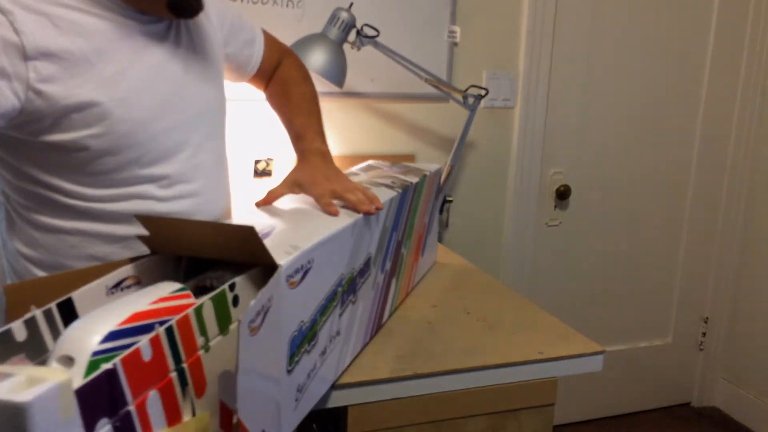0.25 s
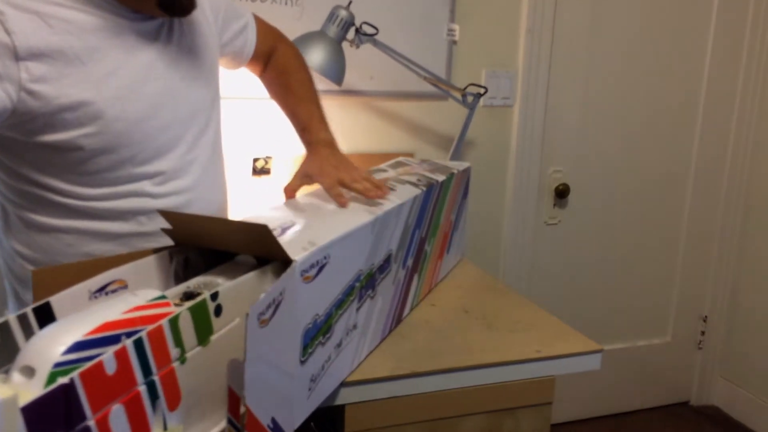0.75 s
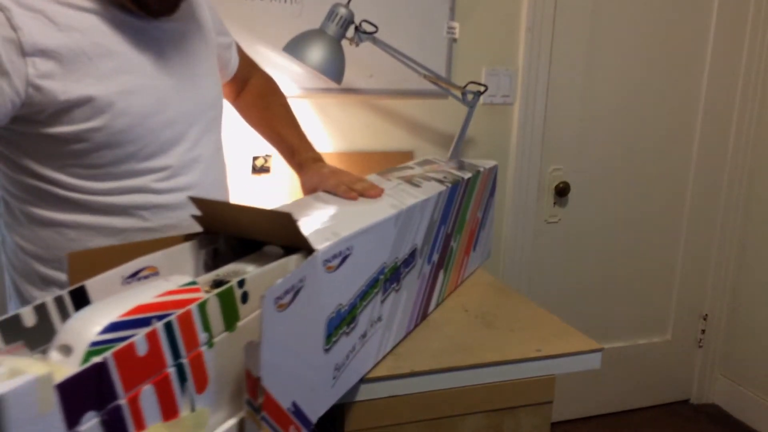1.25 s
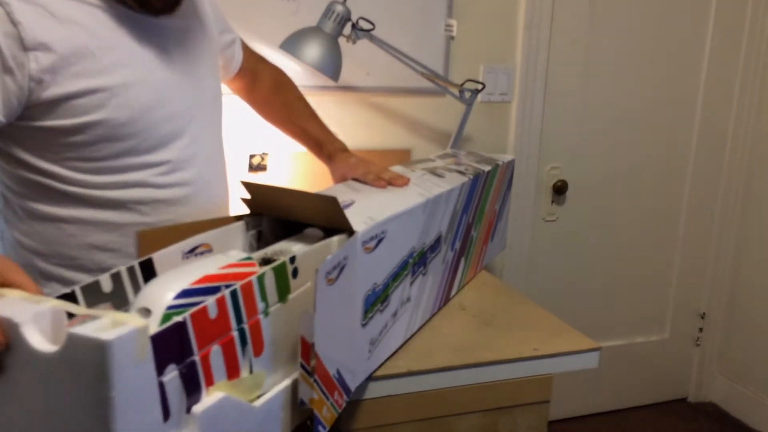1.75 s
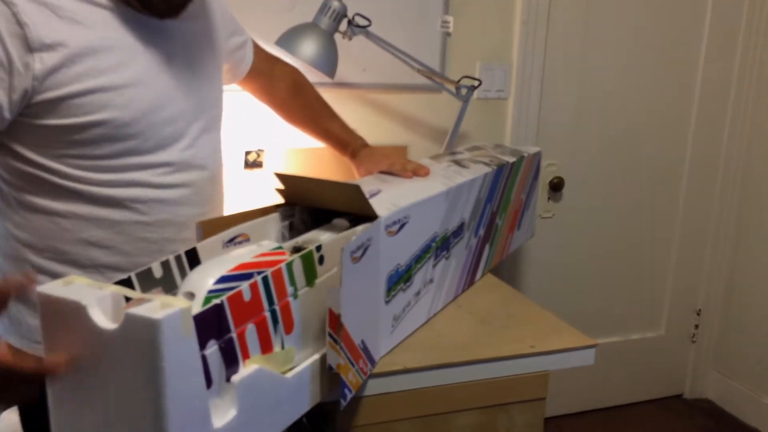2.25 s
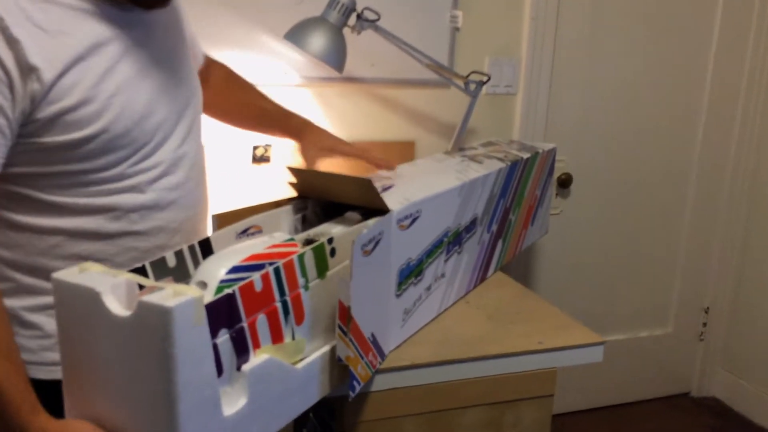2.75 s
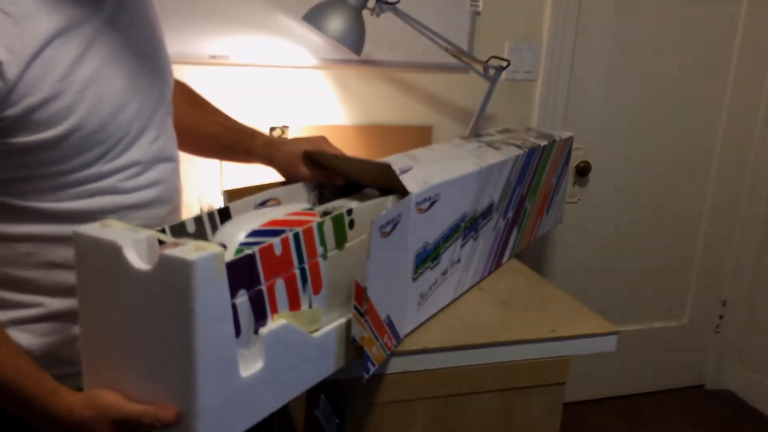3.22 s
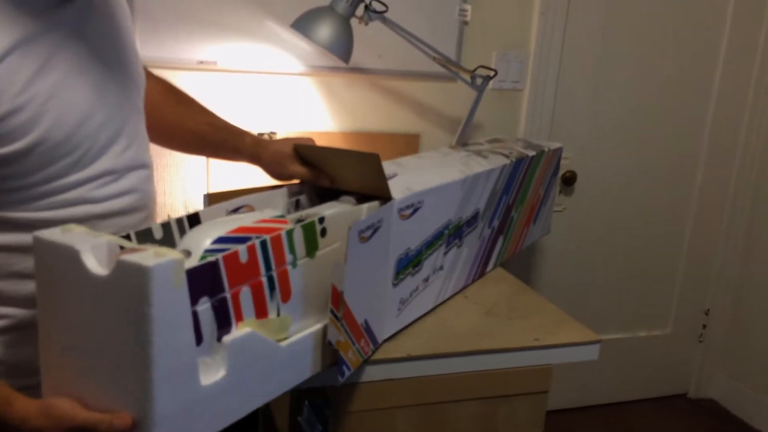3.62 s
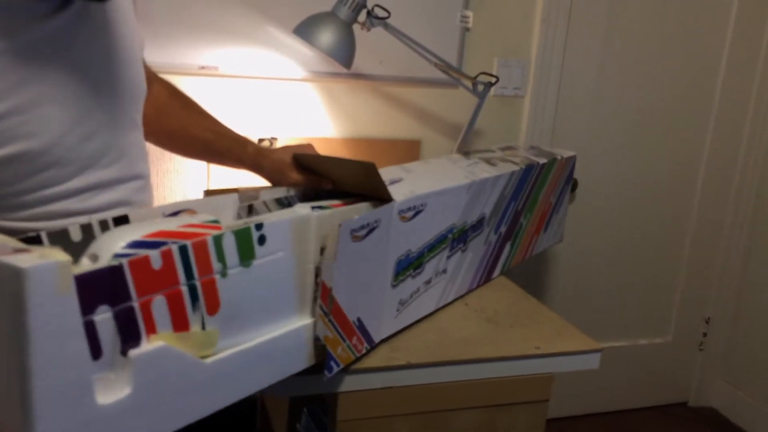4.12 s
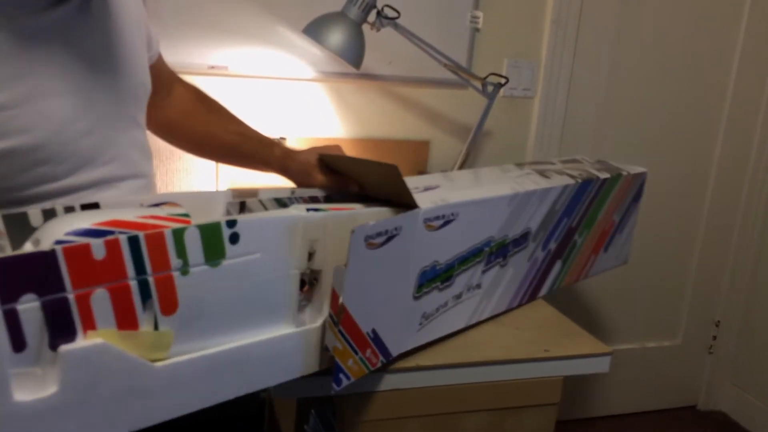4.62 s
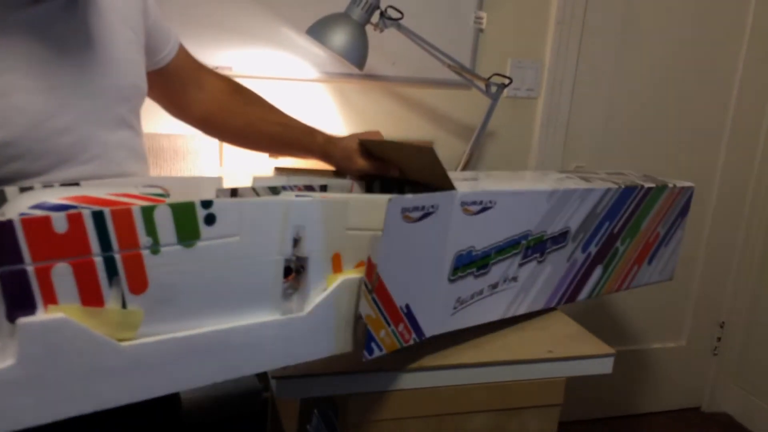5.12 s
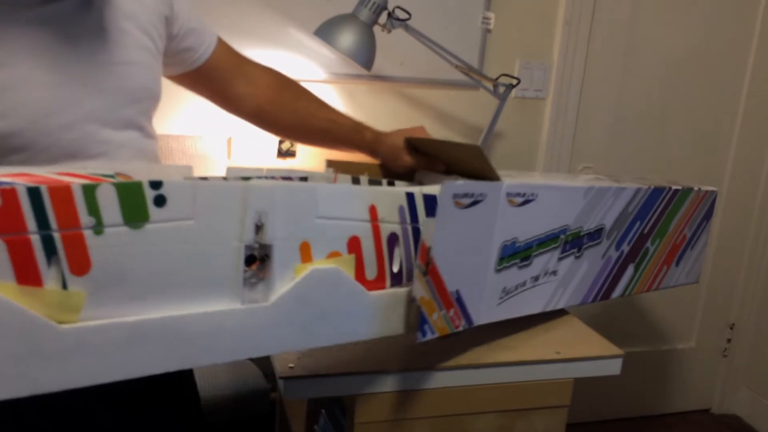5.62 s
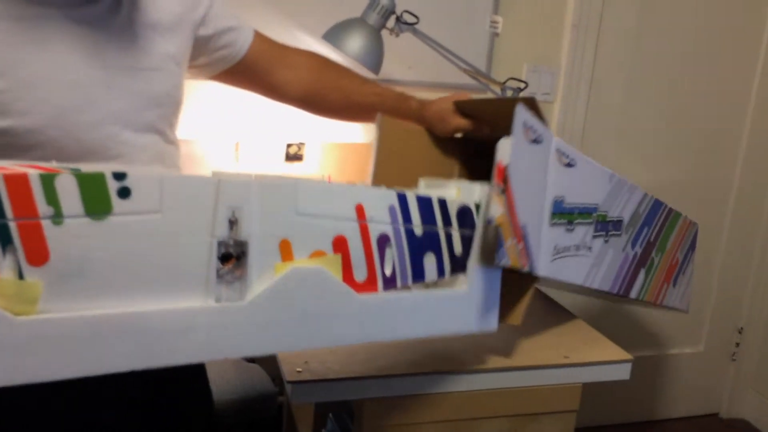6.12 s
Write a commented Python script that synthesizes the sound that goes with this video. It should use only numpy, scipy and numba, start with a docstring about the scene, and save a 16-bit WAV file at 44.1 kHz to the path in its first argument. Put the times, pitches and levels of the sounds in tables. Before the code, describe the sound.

Close, stuttering rub of packing foam on glossy cardboard, pausing and restarting, then a hard knock and a long louder slide ending in a thump.

```python
"""Jerky, papery scraping throughout: a foam tray is pulled out of a long cardboard box, heard close up.
Dense stick-slip releases ring the box walls and panels, and at times one resonance sings out alone.
Foam beads hiss and whistle on the glossy card; this hiss is made of finer slips.
Decaying rings make the box thud on the table and its edges tick, in a small quiet room with still air.
"""
import sys
import numpy as np
from scipy import signal
from scipy.fft import rfft, irfft
from scipy.io import wavfile
from scipy.ndimage import uniform_filter1d
from numba import njit

SR = 44100
rng = np.random.default_rng(int(sys.argv[2]) if len(sys.argv) > 2 else 0)


def generate_wav(signal):
    """Clip the signal to [-1, 1] and save it as 16-bit WAV at the path in sys.argv[1]."""
    frames = np.transpose(np.atleast_2d(signal))
    scaled = np.clip(frames, -1, 1) * 32767
    pcm = np.round(scaled).astype(np.int16)
    wavfile.write(sys.argv[1], SR, pcm)


N = 280917

# One list per pull; pressure sets the scrape, speed the hiss: (t/s, scrape level/dB, bead hiss level/dB)
PULLS = [
    [(0.0, -38.5, -37.5), (0.02, -44.5, -39), (0.198, -39.5, -39), (0.402, -37.5, -40.5),
     (0.45, -37, -38.5), (0.618, -40, -43.5), (0.67, -49, -50)],
    [(0.726, -50, -50), (0.784, -49.5, -61), (0.805, -52, -55.5), (0.885, -51.5, -54), (0.91, -61.5, -68),
     (1.01, -62.5, -78), (1.045, -57, -71), (1.1, -57.5, -68)],
    [(1.135, -51.5, -61), (1.162, -41.5, -48), (1.222, -46, -49.5), (1.25, -40.5, -44), (1.276, -38, -42),
     (1.305, -42.5, -46.5), (1.335, -46.5, -51.5), (1.468, -43, -46.5), (1.548, -39.5, -44.5),
     (1.606, -53, -63)],
    [(1.655, -50.5, -46), (1.698, -35, -41.5), (1.738, -57, -51), (1.83, -48.5, -62), (1.86, -52.5, -68)],
    [(1.874, -43.5, -47.5), (1.948, -40.5, -48.5), (2.044, -45, -55), (2.12, -43, -50.5),
     (2.16, -45.5, -53), (2.195, -39.5, -48), (2.215, -39.5, -49), (2.24, -38.5, -45.5), (2.27, -42.5, -49),
     (2.3, -43, -49), (2.342, -46.5, -52), (2.416, -56, -67), (2.455, -55, -70)],
    [(2.465, -58, -49), (2.533, -62, -52.5), (2.575, -47.5, -48.5), (2.635, -45, -48.5), (2.668, -56, -55),
     (2.68, -53, -50.5), (2.728, -56, -52.5), (2.81, -49, -49), (2.838, -52, -52.5), (2.875, -52, -54.5),
     (2.926, -47, -49.5), (3.022, -57.5, -66), (3.05, -59, -67)],
    [(3.116, -56.5, -55.5), (3.21, -44, -55.5), (3.29, -51.5, -55.5), (3.342, -55, -67)],
    [(3.374, -44, -46.5), (3.44, -44.5, -46), (3.602, -42.5, -43), (3.648, -44.5, -46.5), (3.748, -52, -62)],
    [(3.78, -47, -45), (3.836, -47.5, -44), (3.955, -35, -36.5), (3.982, -23.5, -34), (4.01, -37.5, -39.5),
     (4.088, -44.5, -41.5), (4.252, -38, -45.5), (4.29, -43, -58), (4.325, -48, -63), (4.385, -48.5, -58),
     (4.415, -43, -56)],
    [(4.446, -36, -45.5), (4.556, -31, -38), (4.656, -30.5, -39), (4.72, -35, -45), (4.78, -36, -48.5),
     (4.83, -32.5, -38.5), (4.914, -31, -35), (5.124, -31.5, -40), (5.442, -34, -40.5), (5.55, -41.5, -42)],
    [(5.626, -46, -46), (5.734, -46.5, -46), (5.768, -44, -42.5), (5.845, -49.5, -43.5),
     (5.862, -40, -40.5), (5.905, -36, -40), (5.945, -37.5, -43.5), (5.96, -45, -44), (5.98, -43.5, -40.5),
     (6.1, -48, -41), (6.118, -39, -40), (6.15, -42.5, -42), (6.195, -43, -41.5), (6.225, -42.5, -46)],
    [(6.264, -38, -47), (6.282, -26.5, -35.5), (6.318, -33, -45.5), (6.37, -42, -48)],
]
# How the rubbing is shared out: (t/s, wall boom against scrape level/dB,
# fine hiss against bead hiss level/dB, flap against the other panels level/dB)
RUB_BALANCE = [(0.0, 1.5, -11, 3), (0.35, -0.5, -1.5, 2), (0.5, -1.5, -3.5, 0), (0.85, -1, -7, -1),
               (1.1, -0.5, -5, 1.5), (1.3, -5.5, -10, 1), (1.56, -4.5, -5, 1.5), (1.75, -10, -3, -1),
               (1.9, -2.5, -1.5, -1.5), (2.1, -4.5, -1.5, -1), (2.3, 0, -5, 1), (2.47, 0, 0.5, -1),
               (2.6, -6, 1, 1), (2.66, -4, 4, 3), (2.9, -8, 3, -0.5), (3.1, 1.5, -3, -2),
               (3.4, -8, -9.5, 0.5), (3.85, -7, -4.5, 1.5), (3.99, 1, 2.5, 0.5), (4.1, -11.5, -3.5, 8),
               (4.33, 2, -1, -2.5), (4.56, -7, -2.5, -2.5), (4.75, -0.5, -4.5, -3), (4.94, -11, -8, -1.5),
               (5.1, -4, -5.5, -4), (5.45, -7.5, -0.5, -0.5), (5.66, -18, -1.5, 0.5), (5.77, -12, -3.5, -1),
               (5.84, -13, 0, -2), (5.9, -3, 2.5, -3), (6.04, -20, 1.5, 2.5), (6.2, -5, 4, -6),
               (6.26, 4.5, 3.5, -5), (6.29, -6, -2, 1), (6.33, -1.5, 1, -2)]
# The whole contact catches and lets go: rms depth and rate of the shared throb
JUDDER_DB, JUDDER_PER_S = 0.76, 70
# After a blow the contact shudders on: level against the blow, time to die away
THUD_SHUDDER_DB, THUD_SHUDDER_T60_S = -12, 0.12
SHUDDER_DB_PER_OCTAVE = -0.5  # higher thuds leave slightly less shudder than deep ones
TICK_SHUDDER_DB, TICK_SHUDDER_T60_S = -19.5, 0.25
CRACK_SHUDDER_DB, CRACK_SHUDDER_T60_S = -23, 0.032


def sliding():
    """Rubbing: coarse slips drive walls and panels, finer ones hiss directly and ring the foam."""
    scrape_db, bead_db = curves(np.vstack(PULLS))
    boom_db, fine_db, flap_db = curves(RUB_BALANCE)
    judder_db = JUDDER_DB * walk(JUDDER_PER_S)
    scrape_db = scrape_db + judder_db
    bead_db = bead_db + 0.69 * judder_db

    # the slope is in dB per octave, taken from 300 Hz
    thud_blows = [(s, db + SHUDDER_DB_PER_OCTAVE * np.log2(hz / 300)) for s, db, hz, *_ in THUDS]
    panel_blows = [(s, db) for s, *_, db, hz, t60 in TICKS]
    crack_blows = [(s, db) for s, db, *_ in TICKS]

    scrape = shudder(scrape_db, panel_blows, TICK_SHUDDER_DB, TICK_SHUDDER_T60_S)
    boom = shudder(scrape_db + boom_db, thud_blows, THUD_SHUDDER_DB, THUD_SHUDDER_T60_S)
    bead = shudder(bead_db, crack_blows, CRACK_SHUDDER_DB, CRACK_SHUDDER_T60_S)
    fine = shudder(bead_db + fine_db, crack_blows, CRACK_SHUDDER_DB, CRACK_SHUDDER_T60_S)

    card = scrape * (rubbed_panels(boom_db, flap_db) + singing_panels()) + boom * rubbed_walls()
    foam = bead * (bead_hiss() + bead_whistles()) + fine * foam_tray()
    return card + foam + table_rumble(boom)


# Panel and flap modes: (f/Hz, width/Hz, level/dB)
PANELS = [(697, 75, 0.5), (815, 84, 6), (926, 46, 7), (1025, 102, 6), (1183, 194, 4), (1384, 130, 5),
          (1522, 40, 7), (1597, 56, 6), (1704, 55, 8), (1843, 65, 6.5), (2002, 46, 5.5), (2148, 87, 1.5),
          (2451, 150, 3.5), (2534, 206, -0.5), (2773, 89, -2), (3120, 190, -5.5)]
# Part of the box for each mode: 0 whole box, 1 low panels, 2 flap, 3 high panels
PANEL_PART = [0, 1, 1, 1, 0, 0, 0, 2, 2, 2, 2, 0, 0, 0, 3, 3]
# Panels above the flap: (t/s, level/dB)
HIGH_PANELS = [(0, -1), (1.2, 0), (1.28, 7), (1.4, 1), (2.5, -3), (3.2, -3), (3.5, 1), (4.25, 1), (4.3, -8),
               (4.42, -3), (4.58, 2), (4.75, 0), (4.95, 5), (5.3, 2.5), (5.8, -5), (6.1, -10), (6.2, -3),
               (6.29, -2)]
LOW_PANELS_PER_BOOM_DB = 0.28  # low panels gain this many dB for each dB of wall boom
GRIT_DB = -6.5  # slips heard straight through the card, against the ringing panels


def rubbed_panels(boom_db, flap_db):
    """Coarse slips excite the card's mid resonances, with gritty slips heard straight through it."""
    high_db, = curves(HIGH_PANELS)
    low_db = LOW_PANELS_PER_BOOM_DB * (boom_db - np.mean(boom_db))
    part_db = [0, low_db, flap_db, high_db]
    ringing = coupled(slips(2500, 1.98, 0.99), PANELS, [part_db[k] for k in PANEL_PART], 1.07)
    grit = ring(slips(1500, 2.35, 3.1), [(1470, 1760, 0)])
    panels = unit(ringing) + undb(GRIT_DB) * unit(grit)
    # small panels radiate no bass
    panels = signal.sosfilt(signal.butter(3, 650, "high", fs=SR, output="sos"), panels)
    return unit(ring(panels, [(1450, 3500, 0)]))


# A rubbed panel sings for a while; near the end the air in the box rises in pitch as the tray comes free:
# (start t/s, end t/s, first f/Hz, last f/Hz, level against scrape/dB)
RASPS = [(0.152, .215, 1900, 1690, -3), (.22, .355, 1810, 2000, -0.5), (.235, .3, 484, 486, -3),
         (0.392, 0.542, 1820, 1920, -2.5), (0.433, .51, 1070, 1080, -1.5), (1.24, 1.31, 1800, 1680, -6),
         (3.13, 3.2, 1750, 1650, -3), (1.26, 1.32, 1100, 1160, -7), (1.895, 1.956, 1870, 1500, -2),
         (2.74, 2.846, 1940, 1950, -5), (3.354, 3.47, 1750, 2100, -6), (3.52, 3.674, 1730, 1654, -2),
         (3.9, 3.957, 1940, 1760, 1.5), (4.078, 4.28, 1790, 1800, -9), (4.385, 4.41, 1690, 1700, 0),
         (4.422, 4.445, 990, 1000, -1), (4.45, 4.5, 1780, 1770, 0), (4.51, 4.757, 1800, 1680, -6.5),
         (4.56, 4.61, 3000, 3000, -11), (4.488, 4.56, 1180, 1170, -8), (4.56, 4.7, 917, 975, -7),
         (4.74, 4.893, 1033, 920, -4.5), (4.85, 5.0, 2860, 2840, -7.5), (4.849, 4.97, 1870, 1800, -8.5),
         (4.957, 5.075, 1740, 1750, -6.5), (5.005, 5.26, 507, 494, -7.5), (5.198, 5.43, 1740, 1930, -9.5),
         (5.272, 5.423, 890, 880, -8), (5.403, 5.63, 2340, 2470, -5.5), (5.63, 5.86, 2370, 2240, -11),
         (5.64, 5.85, 1590, 1640, -9), (5.854, 5.925, 940, 1030, -5), (5.86, 5.94, 2480, 2500, -9),
         (5.885, 5.945, 1630, 1230, -8), (5.974, 6.19, 2460, 2280, -9), (6.085, 6.204, 1720, 1770, -6.5),
         (6.218, 6.289, 400, 1010, 2.5), (6.304, 6.348, 633, 374, -0.5)]
# Width of each gliding resonance: a fixed part and a share of the pitch
RASP_WIDTH_HZ, RASP_WIDTH_SHARE = 70, 0.04


def singing_panels():
    """Slips excite narrow panel resonances that slide in pitch, and the box's air rising as the tray leaves."""
    return rasps(RASPS, RASP_WIDTH_HZ, RASP_WIDTH_SHARE, slips(1500, 2.2, 1.9))


# Low wall modes of the box: (f/Hz, width/Hz, level/dB)
WALLS = [(153.8, 20, 0), (212.2, 17, 3.5), (274.4, 27.4, 2), (319, 19, -0.5), (362, 41, -2),
         (432.6, 38.5, -0.5), (483, 48, 0), (566, 57, -3.5), (681, 74, -2.5)]
# Coupling into the long wall, the lowest mode: (t/s, level/dB)
LONG_WALL = [(0, 4), (3.8, 4.5), (4.4, -6), (4.9, -35), (5.7, -28), (5.8, -10), (6.0, -32), (6.2, 9)]


def rubbed_walls():
    """Coarse slips boom in the large walls; the lowest mode follows its own coupling."""
    long_db, = curves(LONG_WALL)
    walls = coupled(slips(2000, 1.83, 0.77), WALLS, [long_db] + [0] * (len(WALLS) - 1), 2.0)
    return unit(ring(walls, [(346, 410, 0)]))


# Spectrum of the bead hiss: (f/Hz, level per Hz/dB)
BEADS = [(1200, -50), (2200, 7), (3000, 2.5), (3400, 2.5), (4080, 4.5), (5710, 1.5), (6990, 4),
         (9000, -2.5), (11700, -5)]


def bead_hiss():
    """Very dense, nearly even slips of foam beads fuse into a hiss."""
    return unit(colour(slips(12000, 0.63, 0.43), BEADS))


# Foam beads whistle in one treble band:
# (start t/s, end t/s, first f/Hz, last f/Hz, level against bead hiss/dB)
WHISTLES = [(1.15, 1.19, 6000, 5500, -3), (1.25, 1.305, 5620, 5200, -4), (2.46, 2.53, 7300, 7300, -4),
            (2.56, 2.59, 13500, 11500, 5), (2.59, 2.645, 11500, 12200, -1), (2.67, 2.75, 11000, 13000, 0),
            (2.67, 2.75, 5600, 7200, -1), (2.78, 2.83, 12500, 11000, 8), (2.77, 2.83, 6500, 8500, -3),
            (2.915, 2.95, 13000, 10000, 6), (5.44, 5.475, 13300, 13300, 1), (5.74, 5.79, 12600, 12400, -1),
            (5.85, 5.92, 12800, 12800, -7), (5.93, 6.07, 7000, 7400, -3), (5.98, 6.22, 14600, 14300, 1),
            (6.08, 6.215, 7540, 10700, 4)]
WHISTLE_WIDTH_SHARE = 0.33  # width of each gliding resonance, as a share of the pitch


def bead_whistles():
    """Fine, patchy slips excite broad treble resonances that slide in pitch."""
    return rasps(WHISTLES, 0, WHISTLE_WIDTH_SHARE, slips(6000, 2.1, 3.6))


# Broad resonances of the foam tray: (f/Hz, width/Hz, level/dB)
FOAM = [(7660, 2000, 5), (9370, 670, -1.5), (9960, 3700, 1.5), (11880, 1300, -1), (13100, 1500, 3.5),
        (14600, 1100, 4)]
# Spectrum laid over the ringing foam: (f/Hz, level per Hz/dB)
FINE = [(3500, -60), (5000, 7), (8000, 5), (10000, 5), (12500, 6), (15500, -0.5)]


def foam_tray():
    """Separate patches of beads excite each foam resonance, giving a fine treble hiss."""
    foam = sum(coupled(slips(9000, 1.6, 1.0), [mode], [0], 2.5) for mode in FOAM)
    return unit(colour(foam, FINE))


# Table modes: (f/Hz, width/Hz, level/dB)
TABLE = [(44, 24, 4.5), (103.3, 10.4, 5)]
# Rumble against the wall boom, dB gained per dB of long-wall coupling, level at rest
RUMBLE_DB, RUMBLE_PER_WALL_DB, RUMBLE_REST_DB = -19.5, 0.3, -65.5


def table_rumble(boom):
    """Sparser, patchy slips ring the table; the rumble follows the wall boom and never quite stops."""
    long_db, = curves(LONG_WALL)
    gain = undb(RUMBLE_DB + RUMBLE_PER_WALL_DB * long_db) * boom + undb(RUMBLE_REST_DB)
    return gain * unit(ring(slips(600, 1.1, 5.5), TABLE))


# Blows on the box: (t/s, level/dB, ring f/Hz, t60/s, table hum against the blow level/dB)
THUDS = [(0.123, -26.5, 236, 0.17, -34), (0.268, -29, 238, 0.18, -18), (0.384, -18.5, 228, 0.037, -29),
         (0.386, -26, 490, 0.044, -30), (0.494, -27.5, 320, 0.2, -31), (0.6785, -28, 560, 0.013, -24),
         (0.684, -30.5, 683, 0.057, -27), (0.694, -38, 296, 0.055, -22), (1.037, -39.5, 172, 0.05, -2.5),
         (1.062, -45, 150, 0.054, -9), (1.087, -46, 140, 0.063, -1), (1.121, -40.5, 373, 0.15, -10.5),
         (1.676, -22.5, 171.5, 0.25, -27), (1.71, -25, 173, 0.17, -31), (1.739, -38, 190, 0.084, -25),
         (1.774, -40, 203, 0.076, -21), (1.867, -30, 398, 0.045, -20), (1.884, -37, 272, 0.037, -14),
         (1.903, -32, 212, 0.046, -16), (1.915, -30, 224, 0.053, -18), (1.921, -30.5, 603, 0.037, -30),
         (1.933, -28.5, 260, 0.035, -17), (1.955, -30.5, 199, 0.043, -22), (2.559, -33, 243, 0.06, -22),
         (2.835, -42, 165, 0.1, -19), (2.865, -47, 150, 0.07, -19), (2.922, -46, 160, 0.06, -19),
         (3.188, -34, 300, 0.054, -18), (3.2, -34, 516, 0.07, -25), (3.207, -28, 237, 0.069, -19),
         (3.232, -39, 229, 0.07, -18), (3.444, -35, 234, 0.11, -29), (3.493, -35, 228, 0.2, -26),
         (3.635, -34.5, 189, 0.045, -16), (3.786, -33, 230, 0.042, -28), (3.89, -39, 228, 0.1, -25),
         (3.935, -23.5, 298, 0.078, -26), (3.964, -14.5, 296, 0.076, -20), (3.976, -10.5, 332, 0.048, -18),
         (3.994, -22.5, 414, 0.12, -10), (4.024, -25, 433, 0.093, -25), (4.77, -31.5, 210, 0.3, -25),
         (5.422, -42, 196, 0.22, -29), (5.525, -40, 237, 0.2, -28), (5.889, -32, 266, 0.08, -30),
         (5.912, -33, 606, 0.05, -32), (5.927, -35, 258, 0.091, -30), (6.117, -48, 200, 0.1, -18),
         (6.143, -32.5, 170, 0.12, -13), (6.175, -40, 159, 0.1, -9), (6.264, -16.5, 190, 0.037, -15.5),
         (6.302, -27.5, 136, 0.047, -1)]


def thuds():
    """Soft blows: the walls nearest in pitch to the loaded one ring, the table hums under them."""
    out, t = np.zeros(N), np.arange(SR // 3) / SR
    turns = rng.random((len(THUDS), len(WALLS)))
    for (s, db, hz, t60, table_db), phases in zip(THUDS, turns):
        wall = np.sin(2 * np.pi * hz * t)
        for (mode_hz, _, mode_db), phase in zip(WALLS, phases):
            # a wall answers 24 dB weaker for each octave between it and the blow
            answer_db = mode_db - 6.0 - 24 * abs(np.log2(mode_hz / hz))
            wall = wall + undb(answer_db) * np.sin(2 * np.pi * (mode_hz * t + phase))
        hum = undb(table_db) * fade(t, 0.12, 0.0032) * np.sin(2 * np.pi * TABLE[-1][0] * t)
        add(out, s, undb(db) * (fade(t, t60, 0.0027) * unit(wall) * 0.5 + hum))
    return out


# Edges letting go: (t/s, crack peak level/dB, crack f/Hz, crack t60/s,
# panel level/dB, panel f/Hz, panel t60/s)
TICKS = [(0.6757, -33, 4750, 0.02, -30, 1790, 0.016), (0.679, -45, 4750, 0.02, -20, 1195, 0.018),
         (0.8027, -33.5, 7740, 0.017, -35, 1700, 0.018), (0.941, -39, 6730, 0.011, -60, 1850, 0.032),
         (1.198, -40, 4590, 0.02, -30, 1920, 0.029), (1.675, -29, 12300, 0.015, -28, 990, 0.022),
         (1.6993, -20.5, 6100, 0.015, -30, 1780, 0.031), (1.7718, -41, 3850, 0.02, -39.5, 1710, 0.024),
         (1.8655, -45, 4020, 0.02, -39, 1375, 0.066), (2.0178, -30, 6500, 0.029, -38, 1350, 0.054),
         (2.4634, -47, 6770, 0.02, -24.5, 1530, 0.015), (2.4758, -50, 3200, 0.02, -39, 1750, 0.027),
         (2.6504, -40, 4200, 0.02, -38.5, 1490, 0.028), (2.909, -24, 11600, 0.044, -47, 1080, 0.035),
         (3.033, -49, 6490, 0.02, -53, 1790, 0.035), (3.3534, -36, 4900, 0.02, -41, 1760, 0.043),
         (3.369, -45, 4000, 0.02, -37, 1750, 0.025), (3.383, -48, 4000, 0.02, -36, 1790, 0.03),
         (3.447, -42, 4000, 0.02, -32.5, 2050, 0.025), (3.468, -48, 4000, 0.02, -34, 1750, 0.022),
         (3.492, -19.5, 6500, 0.017, -30.5, 1770, 0.029), (3.542, -36, 4000, 0.02, -31, 1730, 0.033),
         (3.7855, -14.5, 7400, 0.0079, -36.5, 1680, 0.04), (3.7857, -13.5, 12800, 0.007, -45, 4000, 0.01),
         (3.964, -30, 7060, 0.018, -22, 1080, 0.035), (3.975, -27, 5000, 0.02, -33, 1730, 0.029),
         (3.9832, -22, 4470, 0.02, -27, 1770, 0.034), (5.455, -26, 13000, 0.04, -52, 2400, 0.03),
         (6.146, -45, 4500, 0.02, -38, 1760, 0.016), (6.2774, -28, 4880, 0.018, -19, 1040, 0.023),
         (6.284, -37, 4880, 0.018, -28, 1690, 0.022), (6.302, -28, 4940, 0.02, -22.5, 1290, 0.029)]
SNAP_S = 0.0012  # decay time constant of the clean ring at the front of a crack


def ticks():
    """An edge lets go: a bright crack escapes and the panels ring briefly around one pitch."""
    out, t = np.zeros(N), np.arange(SR // 8) / SR
    noises = rng.standard_normal((len(TICKS), 2, len(t)))
    for (s, crack_db, crack_hz, crack_t60, db, hz, t60), (panel_noise, crack_noise) in zip(TICKS, noises):
        rattle = unit(ring(ring(panel_noise, PANELS), [(hz, 0.6 * hz, 0)]))
        panel = np.sin(2 * np.pi * hz * t) + 1.37 * rattle
        snap = 1.6 * np.sin(2 * np.pi * crack_hz * t) * np.exp(-t / SNAP_S)
        band = ring(crack_noise, [(crack_hz, 0.62 * crack_hz, 0)])
        splinter = unit(band + 0.24 * np.diff(crack_noise, prepend=0))
        crack = fade(t, crack_t60, 0.0003) * (snap + splinter)
        panel_part = undb(db) * fade(t, t60, 0.00015) * panel
        add(out, s, panel_part + undb(crack_db) * crack / np.abs(crack).max())
    return out


ROOM_T60_S, ROOM_TREBLE_T60_S, ROOM_DB = 0.36, 0.15, -14.5


def room(x):
    """A small furnished room: a noisy tail that loses its treble first."""
    t = np.arange(SR // 2) / SR
    tail = rng.standard_normal(len(t)) * (t > .006)
    dull = signal.lfilter([.3], [1, -.7], tail)
    bright = 0.71 * (tail - dull)
    tail = (dull * np.exp(-np.log(1000) * t / ROOM_T60_S)
            + bright * np.exp(-np.log(1000) * t / ROOM_TREBLE_T60_S))
    return x + undb(ROOM_DB) * signal.fftconvolve(x, tail / np.sqrt(np.sum(tail ** 2)))[:N]


# Spectrum of the still air: (f/Hz, level per Hz/dB)
AIR = [(18, -38), (30, -8.5), (145, -3.5), (215, 2), (287, -8), (437, -8), (569, -16), (14800, -26.5),
       (16000, -48)]
AIR_DB = -60


def still_air():
    """Steady shaped noise: the quiet background of the room."""
    return undb(AIR_DB) * unit(colour(rng.standard_normal(N), AIR))


def slips(per_s, spread_db, patchy_db):
    """Tiny stick-slip releases at random moments, mostly small, over a patchy surface."""
    hit = rng.random(N) < per_s / SR
    size_db = spread_db * np.minimum(rng.exponential(size=N), 4.5)
    sign = rng.choice([-1, 1], size=N)
    return hit * undb(size_db) * sign * undb(patchy_db * walk(35))


def coupled(drive, modes, gains_db, drift_db):
    """Each mode is driven through its own coupling, which also wanders as the contact moves."""
    total = 0
    for k, (mode, db) in enumerate(zip(modes, gains_db)):
        total = total + (-1) ** k * ring(drive * undb(db + drift_db * walk(9)), [mode])
    return total


WANDER_SHARE = 0.017  # a singing pitch strays by this share (rms)


def rasps(rows, least_hz, share, drive):
    """Slips caught by a single resonance that fades in, slides as the contact moves, and fades out."""
    out, stray = np.zeros(N), 1 + WANDER_SHARE * walk(25)
    for start, end, from_hz, to_hz, db in rows:
        t = np.arange(start, end, 1 / SR)
        # each row takes its own stretch of the wander and of the slips
        wander = np.roll(stray, -int((start + end) * SR))[:len(t)]
        part = np.roll(drive, -int(start * SR))[:len(t)]
        hz = np.interp(t, [start, end], [from_hz, to_hz]) * wander
        width_hz = least_hz + share * hz.mean()
        held = np.clip(np.minimum(t - start, end - t) / 0.014, 0, 1)
        song = glide(glide(part, hz, width_hz), hz, width_hz)
        add(out, start, undb(db) * held * unit(song))
    return out


@njit
def glide(x, hz, width):
    """A resonance whose centre moves from sample to sample (state-variable band-pass)."""
    y, band, low = np.empty(len(x)), 0., 0.
    for i in range(len(x)):
        g, k = np.tan(np.pi * hz[i] / SR), width / hz[i]
        v = (band + g * (x[i] - low)) / (1 + g * (g + k))
        band, low, y[i] = 2 * v - band, low + 2 * g * v, k * v
    return y


def shudder(steady_db, blows, below_db, t60):
    """Gain of a rubbing layer: steady level plus a dying shake after each (s, dB) blow, summed in power."""
    power, t = undb(steady_db) ** 2, np.arange(SR // 3) / SR
    for s, db in blows:
        add(power, s, (undb(db + below_db) * fade(t, t60, 0.0016)) ** 2)
    return np.sqrt(power)


def ring(x, modes):
    """Resonances of alternating sign, each with its own gain."""
    return sum((-1) ** k * undb(db) * signal.lfilter(*signal.iirpeak(hz, hz / width, fs=SR), x)
               for k, (hz, width, db) in enumerate(modes))


def colour(x, points):
    """Shape a dense signal to (Hz, dB) points."""
    hz, db = np.transpose(points)
    f = np.arange(1, len(x) // 2 + 2) * SR / len(x)
    return irfft(rfft(x) * undb(np.interp(np.log(f), np.log(hz), db)), len(x))


def walk(rate):
    """Random levels held 1 / rate s and slewed, scaled to a spread near 1."""
    k = int(SR / rate)
    held = np.repeat(rng.standard_normal(N // k + 1), k)
    return unit(uniform_filter1d(held, k)[:N])


def curves(rows):
    """Columns of a table joined by straight lines, one value a sample."""
    s, *columns = np.transpose(rows)
    return [np.interp(np.arange(N) / SR, s, c) for c in columns]


def fade(t, t60, rise_s):
    """Envelope with a short rise and an exponential fall, scaled to a top of 1."""
    shape = (1 - np.exp(-t / rise_s)) * np.exp(-np.log(1000) * t / t60)
    return shape / shape.max()


def add(track, s, burst):
    """Mix a burst into a track at s seconds."""
    i = int(s * SR)
    track[i:i + len(burst)] += burst[:len(track) - i]


def undb(db):
    """dB to gain."""
    return 10 ** (np.asarray(db) / 20)


def unit(x):
    """Scale to rms 1."""
    return x / np.sqrt(np.mean(x ** 2))


def scene():
    """Box and foam in the room, over still air; one microphone feeds both channels."""
    mono = room(sliding() + thuds() + ticks()) + still_air()
    return np.array([mono, mono])


MIC_LOW_HZ, TOP_HZ = 58.3, 15250


def record(dry):
    """The microphone loses the deep bass; the recorder cuts the top steeply."""
    thin = signal.sosfilt(signal.butter(3, MIC_LOW_HZ, "high", fs=SR, output="sos"), dry)
    return signal.sosfilt(signal.ellip(12, .2, 70, TOP_HZ, fs=SR, output="sos"), thin)


dry = scene()
out = record(dry)
generate_wav(out)
```